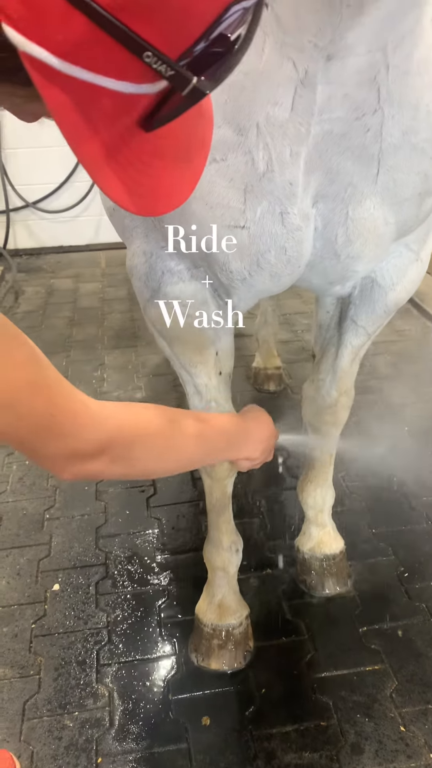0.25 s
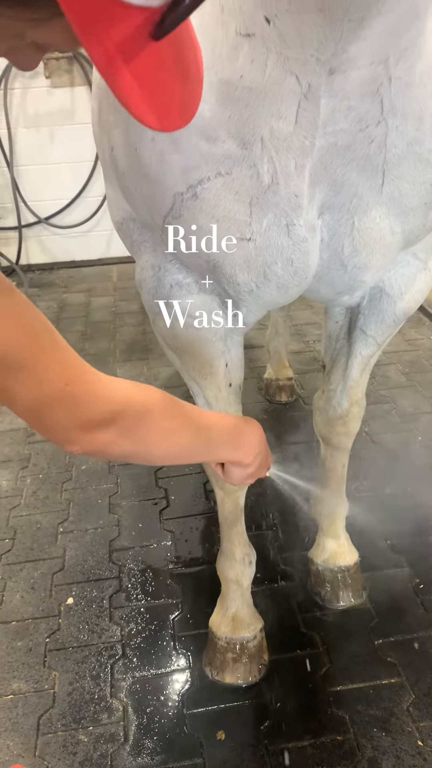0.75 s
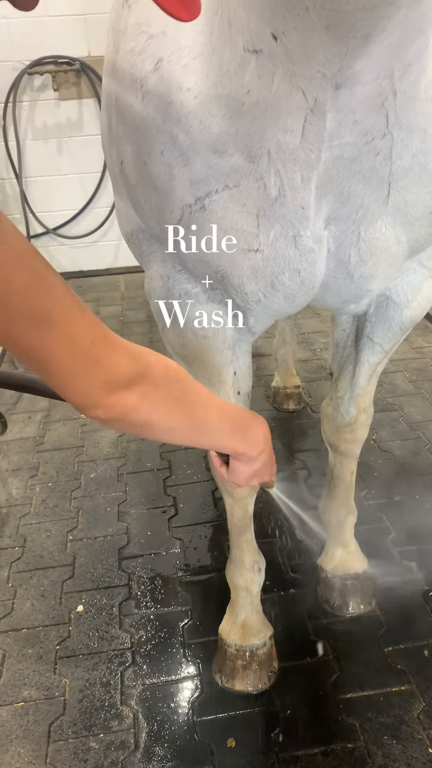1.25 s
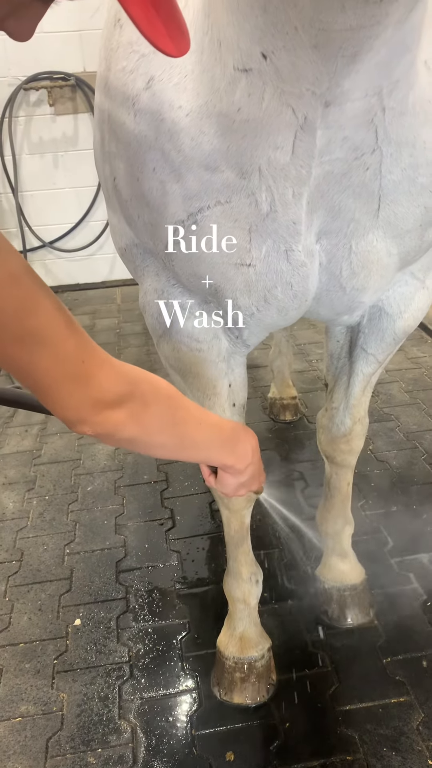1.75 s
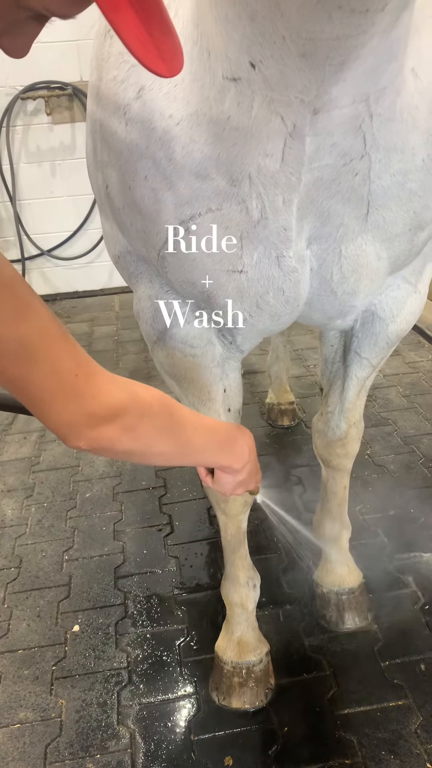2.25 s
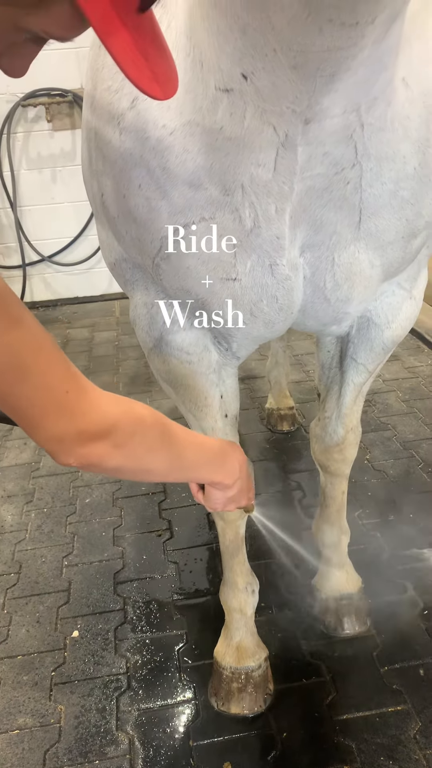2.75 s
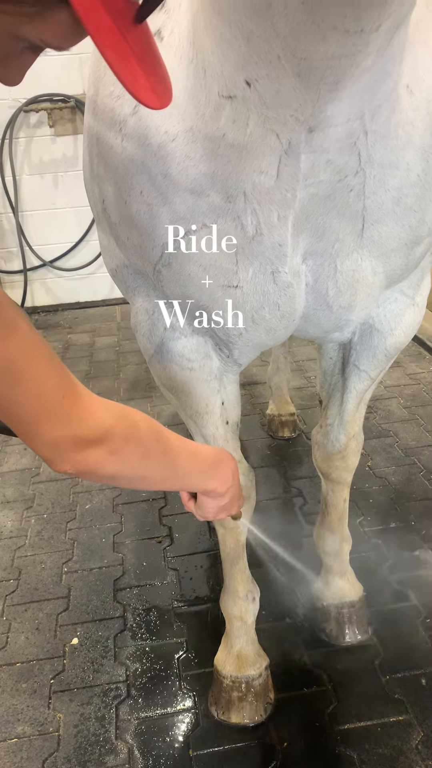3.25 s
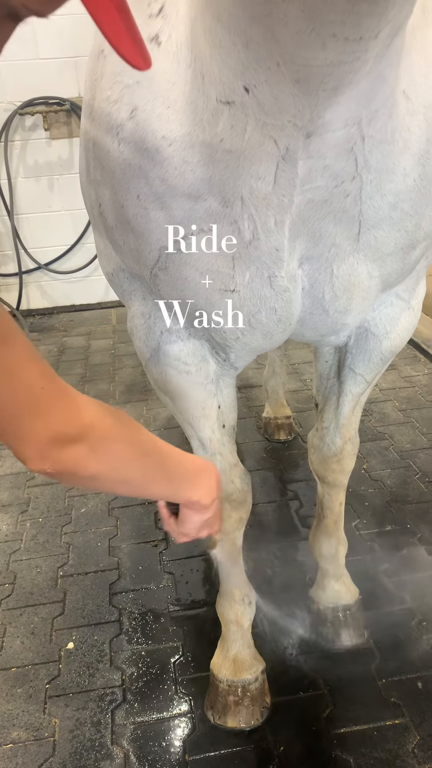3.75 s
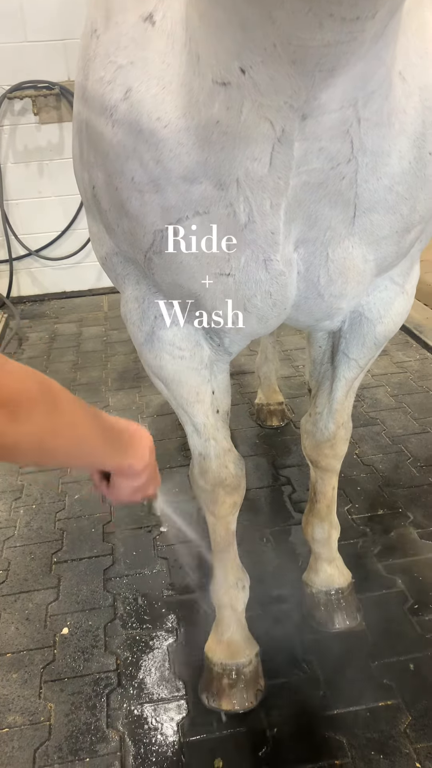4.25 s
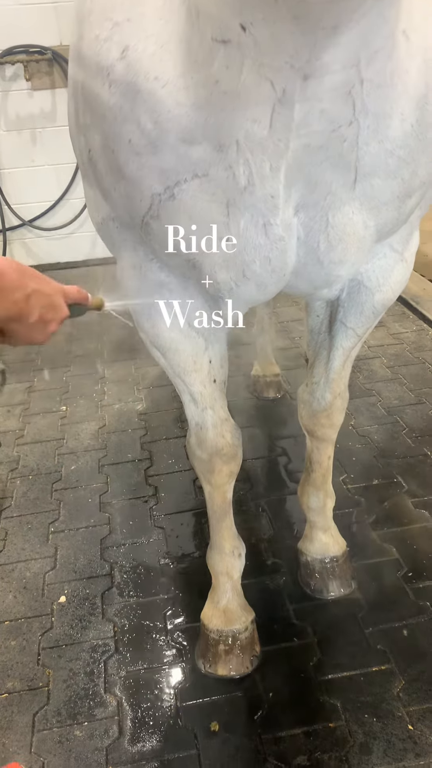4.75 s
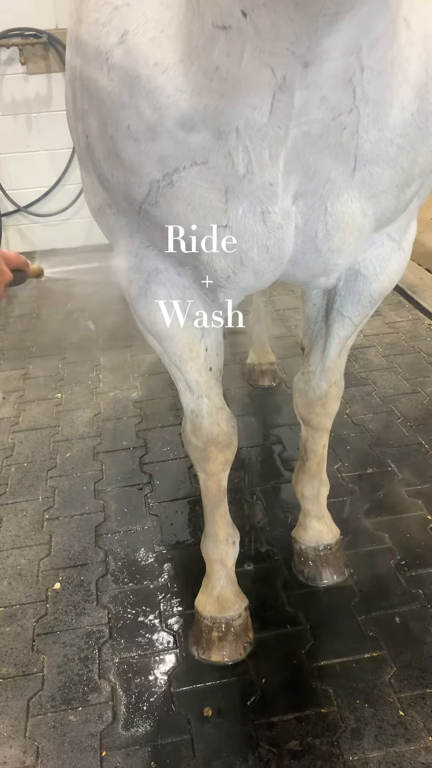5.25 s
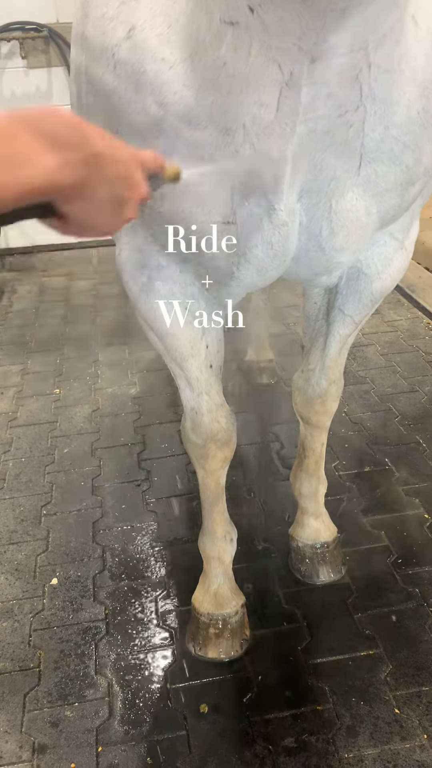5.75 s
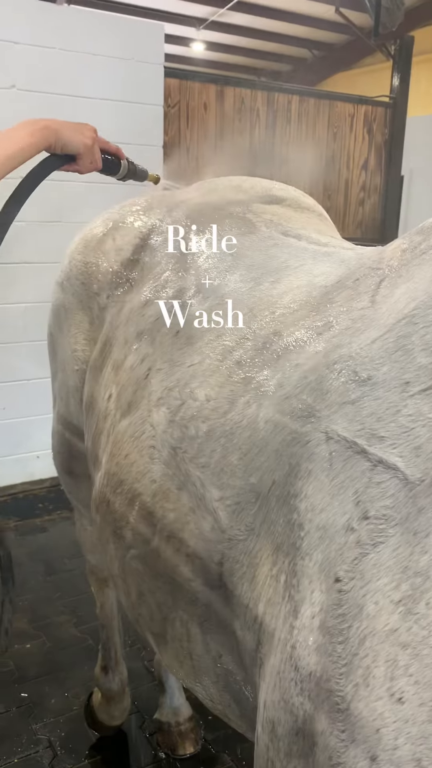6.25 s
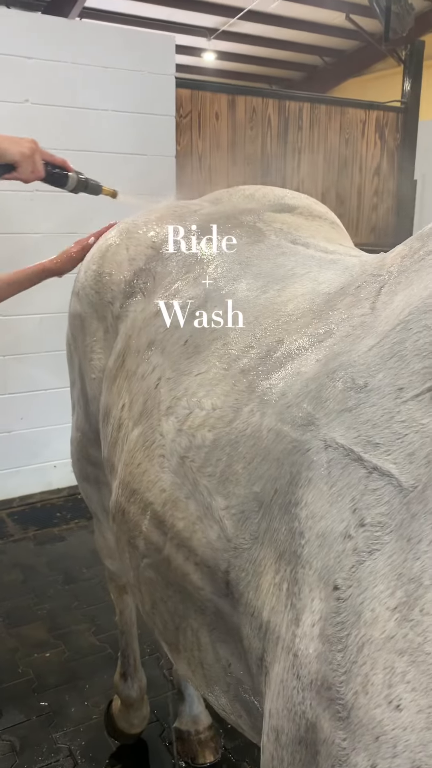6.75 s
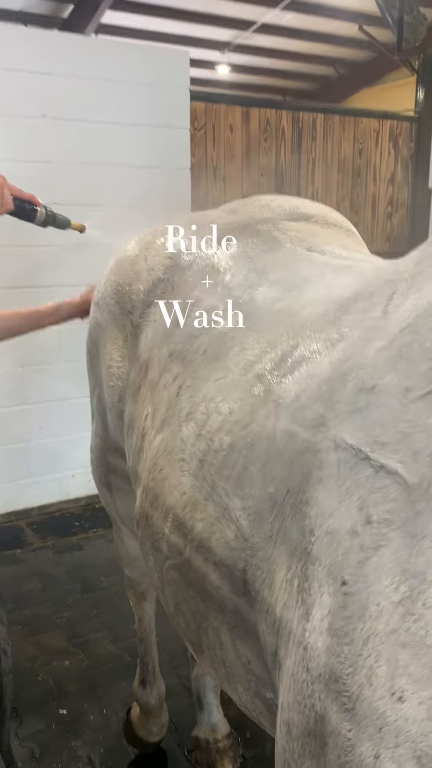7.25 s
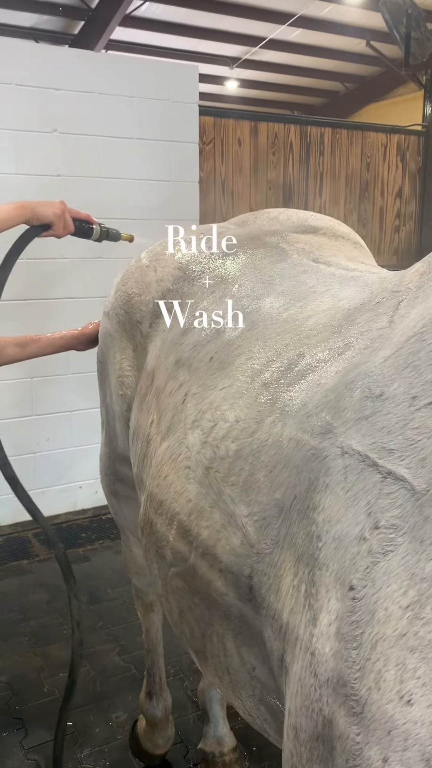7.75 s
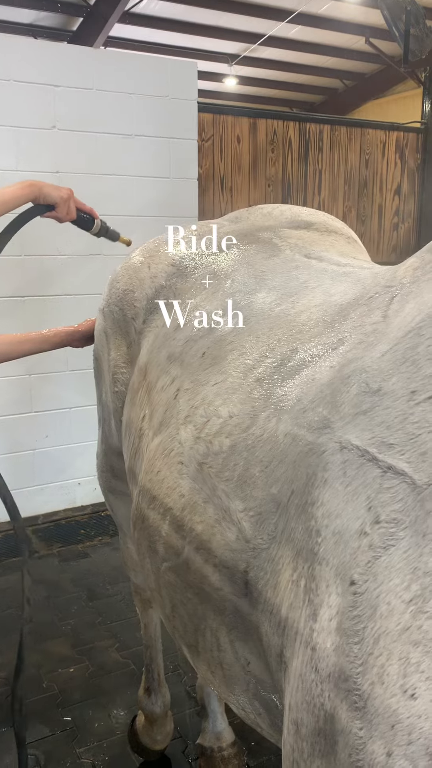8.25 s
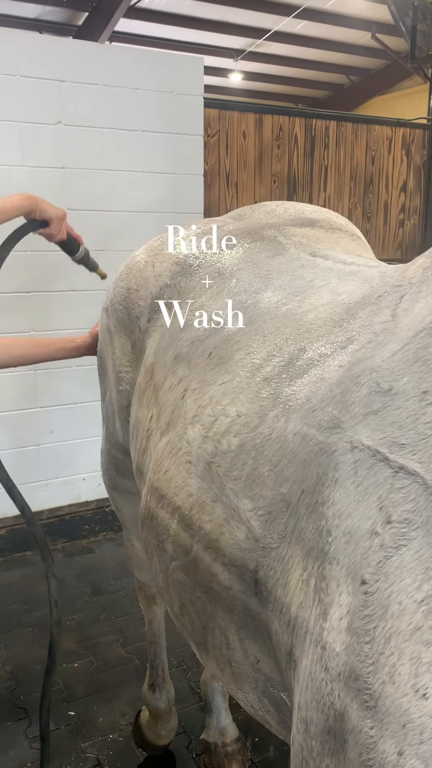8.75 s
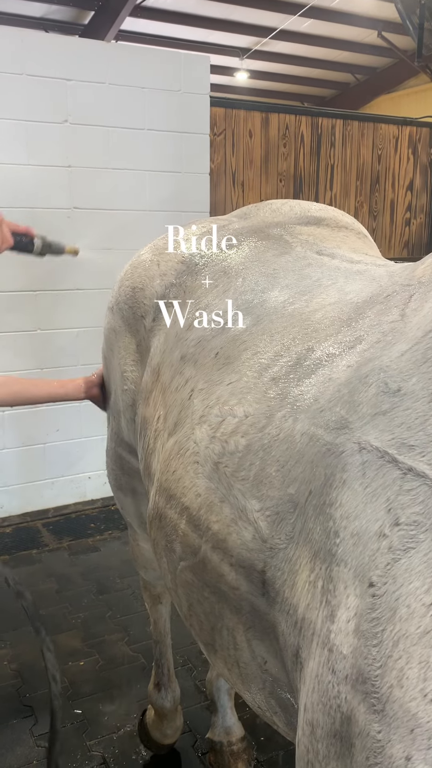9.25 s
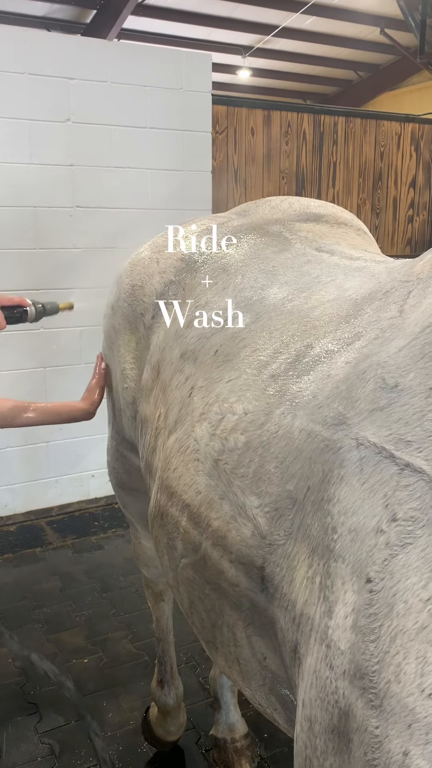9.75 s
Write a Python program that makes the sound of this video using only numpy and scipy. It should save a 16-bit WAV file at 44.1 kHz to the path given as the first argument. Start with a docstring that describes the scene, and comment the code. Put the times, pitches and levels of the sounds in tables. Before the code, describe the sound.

Steady bright water spray fizzes on a horse's coat and spatters over hooves and hard floor, with one dull thud and a low electric hum behind.

```python
"""A spray nozzle hisses close by as a horse is hosed down in a wash bay: noise impacts, coloured and echoed.
The jet sweeps over legs, hooves and wet paving, then over the chest and the rump. Drops fizz on the coat,
splatter with ringing bubbles on hard wet surfaces and patter on the flank: coloured trains of impacts.
Resonant noise makes dull knocks, splashes and low swells, decaying sines a thud, a sinking sine a faint whistle.
An electric motor hums behind: steady sines over low noise. Two close microphone ports pick it all up."""
import sys
import numpy as np
from scipy import signal
from scipy.fft import rfft, irfft, next_fast_len
from scipy.io import wavfile
from scipy.ndimage import uniform_filter1d

SR = 44100
rng = np.random.default_rng(int(sys.argv[2]) if len(sys.argv) > 2 else 0)


def wrap_up_sound(samples):
    """Save the sound to the file named by the first command line argument, as 16-bit audio."""
    columns = np.atleast_2d(samples).T
    # keep every value between -1 and 1, then stretch to whole-number steps
    tamed = np.clip(columns, -1, 1)
    steps = np.round(tamed * 32767).astype(np.int16)
    wavfile.write(sys.argv[1], SR, steps)


N = 440559
TIME = np.arange(N) / SR
STEPS = np.arange(0, N / SR + .002, .002)  # coarse times in s, for the passes of the jet
FRAME_SAMPLES = 1024
RUMP_FROM_S = 5.85
COAT_EDGE_S, HARD_EDGE_S = 0.013, 0.006  # how softly the jet slides on and off


def from_db(db):
    """Decibels to gain."""
    return 10 ** (np.asarray(db) / 20)


def rms_one(x):
    """Scale to unit power."""
    return x / np.sqrt(np.mean(np.abs(x) ** 2) + 1e-20)


def in_time(rows, times=TIME):
    """Each column of a curve at the given times."""
    s, *columns = np.transpose(rows)
    return [np.interp(times, s, c) for c in columns]


def at_hz(points, hz):
    """A table read on a log-frequency axis."""
    known, values = np.transpose(points)
    return np.interp(np.log(hz + 1), np.log(known), values)


def colour(points, hz):
    """Gain of a spectrum, falling 20 dB per octave beyond its ends; mean power 1."""
    octaves_below = np.maximum(np.log2(points[0][0] / (hz + 1)), 0)
    octaves_above = np.maximum(np.log2((hz + 1) / points[-1][0]), 0)
    return rms_one(from_db(at_hz(points, hz) - 20 * (octaves_below + octaves_above)))


def drift(rate_hz):
    """Smooth random curve of rms 1: noise at SR / 40 through two equal poles at rate_hz."""
    r = np.exp(-80 * np.pi * rate_hz / SR)
    noise = rng.standard_normal(N // 40 + 2002)
    slow = signal.lfilter([1], [1, -2 * r, r * r], noise)[2000:]  # drop the run-in
    return np.interp(np.arange(N) / 40, np.arange(len(slow)), rms_one(slow))


def patches(shape, size):
    """Smooth random field of rms 1 over pitch and time; size = (bins, frames) across."""
    field = rng.standard_normal(shape)
    for axis in (0, 1):
        for _ in range(2):
            field = uniform_filter1d(field, size[axis], axis=axis)
    return rms_one(field)


def drops(per_s, spread_db, flutter_db):
    """Three trains of impacts (direct, scattered left, scattered right); the jet breaks into uneven clumps."""
    born = rng.random((3, N)) < per_s / SR
    size_db = spread_db * np.minimum(rng.exponential(1, (3, N)), 7)
    sizes = from_db(size_db) * rng.standard_normal((3, N))
    clumps = from_db(flutter_db * (drift(25.0) + drift(38)))
    return rms_one(born * sizes * clumps)


def at_rump(s):
    """0 beside the forelegs, 1 beside the rump."""
    return np.clip((s - RUMP_FROM_S) * 10, 0, 1)


def on_surface(passes, edge_s):
    """For each pass, 0 to 1 and back as the jet slides on, stays and slides off."""
    start, length = np.transpose(passes)[:2, :, None]
    slide_on = np.tanh((STEPS - start) / (2 * edge_s))
    slide_off = np.tanh((STEPS - start - length) / (2 * edge_s))
    return (slide_on - slide_off) / 2


def pass_power(passes, edge_s):
    """Power that each pass gives over time."""
    return on_surface(passes, edge_s) ** 2 * from_db(np.array(passes)[:, 2:3]) ** 2


# Likeness of the two ports. Each row: frequency in Hz, share of direct power 0-1.
PORT_LIKENESS = [(100, 1), (300, 0.8), (750, 0.2), (1400, 0.85), (2600, 0.75), (3700, .8), (4400, 1),
                 (13500, 1), (15600, 0.8)]


def ports(parts, hz, phase):
    """Direct sound reaches the two ports out of step; scattered sound differs at each."""
    alike = np.clip(at_hz(PORT_LIKENESS, hz), 0, 1)
    lead = np.interp(hz, *np.transpose(phase))
    direct = np.stack([parts[0], parts[0] * np.exp(-1j * lead)])
    return np.sqrt(alike) * direct + np.sqrt(1 - alike) * parts[1:]


# Peaks and dips of the ports. Each row: centre in Hz, width in Hz, gain in dB.
PORT_RESONANCES = [(7450, 250, -1.5), (8150, 250, 1.5), (14200, 400, 0.8)]


def filtered(trains, response, phase, patchy_db):
    """Three trains through a moving filter response(hz, s), in stereo; each band swells and fades."""
    hz, s, frames = signal.stft(trains, SR, nperseg=FRAME_SAMPLES)
    hz = hz[:, None]
    port_db = sum(db * np.exp(-.5 * ((hz - centre) / width) ** 2) for centre, width, db in PORT_RESONANCES)
    gain = from_db(port_db + patchy_db * patches(frames.shape[1:], size=(4, 4)))
    stereo = ports(frames, hz, phase) * (response(hz, s) * gain)
    return signal.istft(stereo, SR)[1][:, :N]


# Surfaces near the nozzle. Each row: echo delay in s, its rms wander in s,
# echo share 0-1 beside the forelegs, echo share 0-1 beside the rump.
NEAR_SURFACES = [(.0009, .00002, .12, .1), (.0018, .000012, .22, .1), (.0035, .000015, .2, .14),
                 (.0052, .00002, .14, .1)]


def near_echoes(hz, s):
    """Echoes off legs, belly and floor comb the hiss; the combs slide as the hand moves."""
    comb = 1
    for delay_s, wander_s, front_share, rump_share in NEAR_SURFACES:
        lag_s = delay_s + wander_s * np.interp(s, TIME, drift(0.84))
        share = front_share + (rump_share - front_share) * at_rump(s)
        comb = comb + share * np.exp(-2j * np.pi * hz * lag_s)
    return comb


# The nozzle as the hand carries it round. Each row: time in s, hiss in dB before swell and trim,
# brightness in dB per octave above 8 kHz, steady fizz of the mist in dB before trim.
NOZZLE_PATH = [(0, -32.5, 12.5, -49), (.17, -27, -6.5, -50), (.38, -28.5, 2, -50), (1.2, -29, 2, -41.5),
               (1.55, -29.5, 5.5, -44.5), (3.5, -30.5, 8, -33.5), (3.68, -26, 2, -43),
               (4.45, -26.5, 1.5, -50), (5.12, -26.5, 1.5, -43), (5.55, -25.5, 2, -38),
               (5.78, -24, 3, -40.5), (5.92, -25.5, -1, -31), (6.08, -36, 13.5, -32),
               (6.25, -29.5, 3, -32.5), (6.36, -27.5, 0.5, -44), (6.8, -26, -1.5, -36.5),
               (7.35, -25, -6, -36.5), (7.6, -27.5, -5, -46), (8.7, -26, -2.5, -42.5),
               (9.3, -24, -5.5, -40), (9.8, -22.5, -2.5, -31)]
# Echo off the close rump. Each row: time in s, third dip of its comb in Hz, echo share 0-1.
RUMP_ECHO = [(5.85, 9000, 0), (6.05, 10300, .35), (6.28, 11500, .4), (6.45, 12300, 0), (9.15, 12000, 0),
             (9.35, 10400, .45), (9.5, 9200, .4), (9.65, 7600, 0)]
# Jet full on the coat. Each row: start in s, length in s, fizz in dB before trim, swell of the hiss in dB.
COAT_PASSES = [(-.03, 0.15, -30, 3), (.43, 0.078, -30, 1), (.52, 0.071, -28.5, 0.5), (1.29, 0.098, -39, 2),
               (2.03, 0.094, -30, 0.5), (2.11, 0.082, -26, 1), (2.2, 0.11, -32, 0.5),
               (2.48, 0.11, -29.5, 0), (3.865, 0.018, -23, -2), (4.04, 0.039, -38, 0),
               (4.14, 0.081, -33, -0.5), (4.33, 0.086, -46, 1), (4.49, 0.11, -29, 5.5),
               (4.655, 0.091, -30, 5.5), (4.78, 0.17, -28, 5), (4.96, 0.085, -28, 6.5),
               (5.165, .14, -29, 4), (5.32, .16, -33, 4), (5.67, 0.039, -36, 5), (6.31, 0.05, -47, 5)]
# Hiss spectrum. Each row: frequency in Hz, relative density in dB per Hz.
HISS_COLOUR = [(1000, -35), (1350, -9), (1800, -28), (2600, -19), (3200, -17), (4100, -10), (5200, -11),
               (7200, -4.5), (8700, 0), (9600, 2.5), (12000, 0.5), (14000, -0.3), (15600, -2.2)]
# Lead of the left port over the right, sound from the nozzle. Each row: frequency in Hz, phase in radians.
NOZZLE_PHASE = [(0, 0), (1700, .2), (2900, .8), (3500, 1.8), (4700, 3.14), (8950, 9.42), (13200, 15.7),
                (16000, 19.4)]


def nozzle(unsteady_db=-0.17, trim_db=-2.01):
    """Turbulent hiss, its brightness following the aim, swelling on the coat, combed by the echo off the rump."""
    def response(hz, s):
        _, brightness, _ = in_time(NOZZLE_PATH, s)
        dip_hz, share = in_time(RUMP_ECHO, s)
        echo = np.abs(1 + share * np.exp(-5j * np.pi * hz / dip_hz))  # delay 2.5 / dip_hz
        tilt = from_db(brightness * np.log2(np.maximum(hz / 8000, 1)))
        return colour(HISS_COLOUR, hz) * tilt * echo * near_echoes(hz, s)
    turbulence = drops(per_s=30000, spread_db=0.5, flutter_db=.5)
    swells_db = np.array(COAT_PASSES)[:, 3] @ on_surface(COAT_PASSES, COAT_EDGE_S)
    level_db = in_time(NOZZLE_PATH)[0] + np.interp(TIME, STEPS, swells_db) + unsteady_db * drift(6.7)
    return from_db(level_db + trim_db) * filtered(turbulence, response, NOZZLE_PHASE, patchy_db=2.55)


# Fizz spectrum. Each row: frequency in Hz, relative density in dB per Hz.
COAT_COLOUR = [(1000, -40), (1900, -13), (2700, -7), (3250, -17), (3600, -4), (4000, 1), (5000, 1.5),
               (6000, 3), (8000, 1), (11000, -14), (15600, -14)]


def coat_fizz(trim_db=-1.3):
    """Fine drops burst on wet hair: a mist of slowly changing level, and a surge with each pass."""
    impacts = drops(per_s=14000, spread_db=-1.5, flutter_db=-0.28)
    mist_power = from_db(in_time(NOZZLE_PATH, STEPS)[2]) ** 2
    power = mist_power + pass_power(COAT_PASSES, COAT_EDGE_S).sum(0)
    fizz = filtered(impacts, lambda hz, s: colour(COAT_COLOUR, hz), NOZZLE_PHASE, patchy_db=3.5)
    return np.interp(TIME, STEPS, np.sqrt(power)) * from_db(trim_db) * fizz


# Jet over hoof and paving. Each row: start in s, length in s, level in dB before trim,
# pitch of the bubbles in the water film in Hz, how far their ring stands out in dB.
HARD_PASSES = [(0, .09, -40, 2900, 4), (0.09, 0.047, -29.5, 2200, 5), (0.248, 0.099, -38.5, 2600, 5),
               (0.336, 0.09, -31, 2010, 2), (0.42, 0.24, -37, 2950, 8), (0.66, 0.15, -39.5, 2940, 5),
               (1.084, .18, -47, 2600, 8), (1.268, 0.1, -36.5, 2420, 15), (1.374, 0.093, -42.5, 2420, 14),
               (1.462, 0.075, -30.5, 1900, 6), (1.546, 0.28, -32.5, 2330, 9.5),
               (1.838, 0.31, -33.5, 2940, 5.5), (2.16, 0.2, -34, 2740, 3.5), (2.362, 0.3, -35.5, 2650, 6),
               (2.663, 0.2, -31.5, 2270, 11), (2.87, 0.11, -36, 2470, 11), (2.974, 0.17, -35, 2380, 16),
               (3.13, 0.29, -37.5, 2650, 14.5), (3.4, 0.17, -34.5, 2550, 11), (3.566, 0.12, -43, 2550, 6),
               (3.825, 0.048, -30, 2120, 9.5), (4.046, 0.045, -31, 2430, 7), (4.1, 0.069, -35, 1940, 13),
               (4.156, 0.11, -33, 2850, 6.5), (4.276, 0.069, -31.5, 2450, 12),
               (4.337, .045, -27.5, 1750, 4.5), (5.883, 0.44, -43, 1880, 16), (6.354, 1.0, -44.5, 3100, 0),
               (8.81, 0.33, -42.5, 2400, 12), (9.295, 0.77, -42, 3430, 7)]
# Splatter spectrum. Each row: frequency in Hz, relative density in dB per Hz.
SPLATTER_COLOUR = [(900, -29), (1300, -9), (1900, -6.5), (2400, -8), (3000, -4), (4200, -2.5), (5200, -7.5),
                   (6500, -5.5), (10000, -10)]
# Lead of the left port, sound from where the water lands. Each row: frequency in Hz, phase in radians.
LANDING_PHASE = [(0, 0), (1600, 0), (2200, 2.4), (2450, 2.7), (2700, 2.1), (3000, 1.4), (3500, 1.8),
                 (4700, 3.14), (8950, 9.42)]
RING_WIDTH_OCTAVES = .2
RUNOFF_DB, RUNOFF_HZ, RUNOFF_RING_DB = -46, 2280, -3  # stray drops on the paving; level before trim


def splatter(wander_octaves=0.025, trim_db=-1.5):
    """Coarser drops hit hoof and paving; film bubbles ring at a pitch that wanders with the spot that is hit."""
    passes, runoff = pass_power(HARD_PASSES, HARD_EDGE_S), from_db(RUNOFF_DB) ** 2
    power = passes.sum(0) + runoff
    _, _, _, pass_hz, pass_ring_db = np.transpose(HARD_PASSES)
    film_hz = (pass_hz @ passes + RUNOFF_HZ * runoff) / power  # power-weighted mean
    ring_db = (pass_ring_db @ passes + RUNOFF_RING_DB * runoff) / power
    wander = wander_octaves * drift(4.9)

    def response(hz, s):
        octaves = np.log2((hz + 1) / np.interp(s, STEPS, film_hz)) - np.interp(s, TIME, wander)
        bump = np.exp(-.5 * (octaves / RING_WIDTH_OCTAVES) ** 2)
        return colour(SPLATTER_COLOUR, hz) * from_db(np.interp(s, STEPS, ring_db) * bump)
    impacts = drops(per_s=7600, spread_db=1.0, flutter_db=-0.62)
    splats = filtered(impacts, response, LANDING_PHASE, patchy_db=3.0)
    return np.interp(TIME, STEPS, np.sqrt(power)) * from_db(trim_db) * splats


# Water drumming on the body. Each row: time in s, level in dB before trim.
PATTER_LEVEL = [(0, -48), (2, -47.5), (4.4, -49), (5.4, -45), (5.78, -47.5), (5.9, -40.5), (6.6, -42.8),
                (7.8, -44), (8.7, -44.5), (9.97, -43.5)]
# Patter spectrum. Each row: frequency in Hz, relative density in dB per Hz.
PATTER_COLOUR = [(450, 0), (600, -2.5), (750, -1), (1200, 0), (1800, -0.5), (2400, -7.5), (3100, -6),
                 (4000, -1.5)]
# Lead of the left port, sound from the rump on the right (negative: right port leads).
# Each row: frequency in Hz, phase in radians.
RUMP_PHASE = [(0, 0.5), (700, -0.85), (1500, -0.6), (2100, -1), (2600, -2.5), (4700, -3.14)]


def patter(trim_db=-1.5):
    """The soft body answers with a dull drumming: straight ahead on the forelegs, from the right on the rump."""
    impacts, place = drops(per_s=4500, spread_db=0.5, flutter_db=0.07), at_rump(TIME)

    def response(hz, s):
        return colour(PATTER_COLOUR, hz)
    front = filtered(impacts, response, LANDING_PHASE, patchy_db=2.0)
    rump = filtered(impacts, response, RUMP_PHASE, patchy_db=2.0)
    return from_db(in_time(PATTER_LEVEL)[0] + trim_db) * ((1 - place) * front + place * rump)


# Short dull knocks, splashes and brief low swells of the rumble. Each row: centre in s,
# half length in s (to -17 dB), pitch in Hz, width in Hz, level in dB.
SHORT_BURSTS = [(5.142, 0.033, 1100, 130, -45.5), (5.145, 0.036, 370, 120, -51),
                (5.763, .014, 540, 80, -53), (8.173, .03, 148, 20, -48), (8.232, .05, 107, 13, -44)]


def short_bursts():
    """Noise rings one resonance under each brief bell-shaped envelope."""
    out = np.zeros(N)
    for s, half_length_s, hz, width_hz, level_db in SHORT_BURSTS:
        r = np.exp(-np.pi * width_hz / SR)
        poles = [1, -2 * r * np.cos(2 * np.pi * hz / SR), r * r]
        ringing = signal.lfilter([1, 0, -1], poles, rng.standard_normal(N))
        envelope = np.exp(-2 * ((TIME - s) / half_length_s) ** 2)
        out += from_db(level_db) * rms_one(ringing * envelope) * np.sqrt(np.mean(envelope ** 2))
    return out


# A dull thud, as of a hoof set down. Each row: time in s, level in dB,
# frequency in Hz above which the contact is too soft to excite.
THUD_BLOWS = [(5.834, -48, 900), (5.844, -36.5, 750), (5.851, -47.5, 650), (5.867, -39, 330)]
# What it rings with. Each row: frequency in Hz, relative level in dB, t60 in s.
THUD_MODES = [(278, 0, 0.076), (343, -1, 0.078), (515, 2, 0.044), (590, -8, 0.054)]


def thud():
    """A few quick blows ring one dull body; the softer the contact, the weaker its upper modes."""
    out = np.zeros(N)
    for s, level_db, soft_hz in THUD_BLOWS:
        age_s = np.maximum(TIME - s, 0)
        for hz, mode_db, t60_s in THUD_MODES:
            gain = from_db(level_db + mode_db) / (1 + (hz / soft_hz) ** 4)
            decay = from_db(-60 * np.minimum(age_s / t60_s, 3))
            out += gain * decay * np.sin(2 * np.pi * hz * age_s)
    return out


# A faint thin tone in broken pieces. Each row: start in s, length in s, starting pitch in Hz,
# starting level in dB.
WHISTLES = [(1.99, 0.05, 762, -53), (2.06, 0.18, 745, -50), (2.235, .075, 720, -54)]
WHISTLE_SAG_HZ_PER_S, WHISTLE_EDGE_S, WHISTLE_FADE_DB_PER_S = 110, 0.014, 85


def whistle(waver_hz=11, flutter_db=2.5):
    """Each piece of the thin tone starts quickly, sinks and dies."""
    out = np.zeros(N)
    waver, flutter = waver_hz * drift(29), flutter_db * drift(25)
    for s, length_s, hz, start_db in WHISTLES:
        age_s = np.clip(TIME - s, 0, length_s)
        phase = 2 * np.pi * np.cumsum(hz - WHISTLE_SAG_HZ_PER_S * age_s + waver) / SR
        edges = np.minimum(np.minimum(age_s, length_s - age_s) / WHISTLE_EDGE_S, 1)
        level_db = start_db - WHISTLE_FADE_DB_PER_S * age_s + flutter
        out += np.sqrt(2) * from_db(level_db) * edges * np.sin(phase)
    return out


# Motor lines. Each row: frequency in Hz, mean level of the two ports in dB beside the forelegs,
# the same beside the rump, rms unsteadiness in dB.
HUM_LINES = [(37.7, -55, -55, 0), (74.8, -57.5, -56, 3.5), (121, -60, -50.5, 0.5), (161.1, -58, -60, 4.5),
             (240.2, -43, -42.5, 0.18), (297.7, -59.5, -56, 2.5), (314, -65.5, -74, 2.5),
             (359, -61.5, -64.5, 2.5), (415, -66.5, -69.5, 2), (478, -70, -67, 2), (570.4, -69, -64, 3),
             (638, -85, -67.5, 1)]
# Rumble spectrum. Each row: frequency in Hz, relative density in dB per Hz.
RUMBLE_COLOUR = [(25, -26), (45, -21), (60, 0.5), (76, 3), (95, 0.5), (125, -5.5), (165, -8.5), (210, -8),
                 (290, -9), (380, -20.5), (550, -22), (900, -45)]


def motor(rumble_db=-45.0):
    """Mains and shaft lines over a low rumble; standing waves give each spot in the bay its own balance."""
    hum, place = np.zeros(N), at_rump(TIME)
    for line_hz, front_db, rump_db, unsteady_db in HUM_LINES:
        level_db = front_db + (rump_db - front_db) * place + unsteady_db * drift(3.2)
        hum += np.sqrt(2) * from_db(level_db) * np.sin(2 * np.pi * (line_hz * TIME + rng.random()))
    size = next_fast_len(N)
    hz = np.fft.rfftfreq(size, 1 / SR)
    air = ports(rfft(rng.standard_normal((3, size))), hz, NOZZLE_PHASE)
    rumble = irfft(air * colour(RUMBLE_COLOUR, hz), size)[:, :N]
    return hum * from_db([[.8], [-.8]]) + from_db(rumble_db) * rumble  # hum a little stronger at left


HUM_SWELL_CENTRE_S, HUM_SWELL_HALF_LENGTH_S, HUM_SWELL_HZ, HUM_SWELL_DB = 1.77, 0.32, 161, -48


def hum_swell():
    """A low line rises out of the hum and sinks back."""
    envelope = np.exp(-2 * ((TIME - HUM_SWELL_CENTRE_S) / HUM_SWELL_HALF_LENGTH_S) ** 2)
    tone = np.sin(2 * np.pi * (HUM_SWELL_HZ * TIME + rng.random()))
    return np.sqrt(2) * from_db(HUM_SWELL_DB) * envelope * tone


def scene():
    """Water in front, the motor behind."""
    water = nozzle() + coat_fizz() + splatter() + patter()
    return water + short_bursts() + thud() + whistle() + motor() + hum_swell()


CUTOFF_HZ = 15700


def record(dry):
    """The top is cut steeply."""
    return signal.sosfilt(signal.ellip(12, .1, 90, CUTOFF_HZ, fs=SR, output="sos"), dry)


dry = scene()
out = record(dry)
wrap_up_sound(out)
```